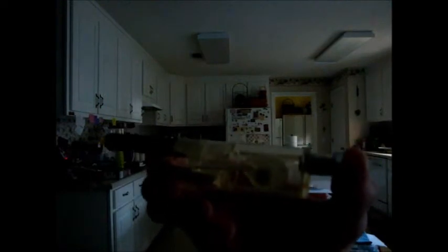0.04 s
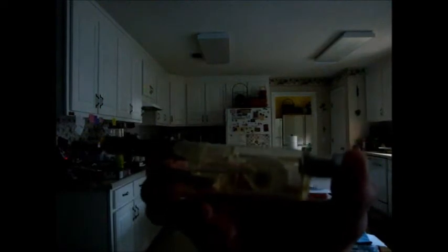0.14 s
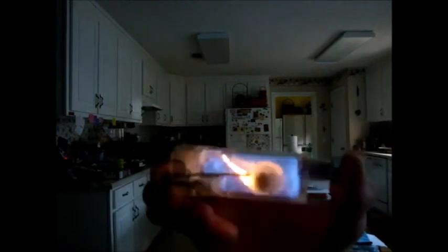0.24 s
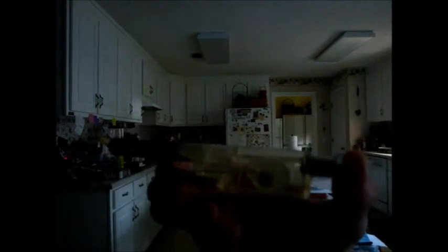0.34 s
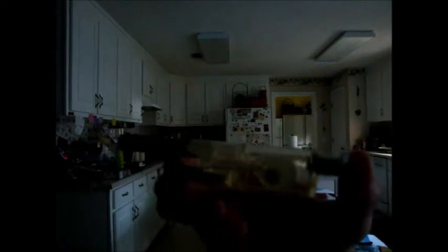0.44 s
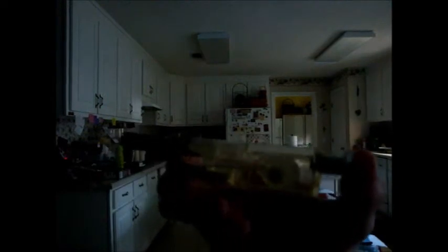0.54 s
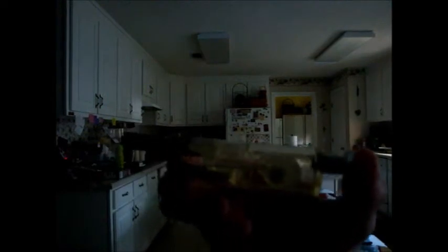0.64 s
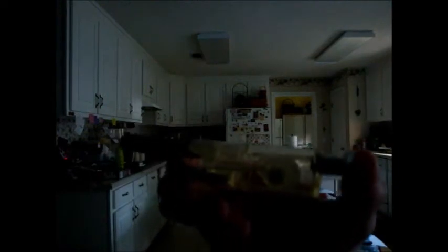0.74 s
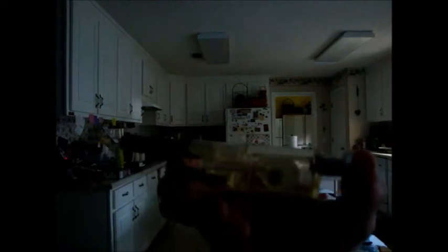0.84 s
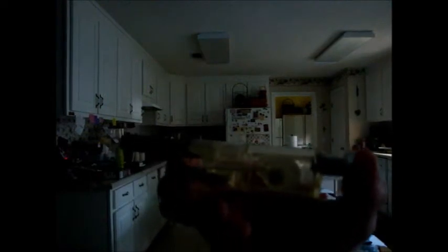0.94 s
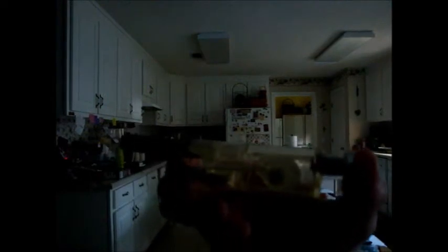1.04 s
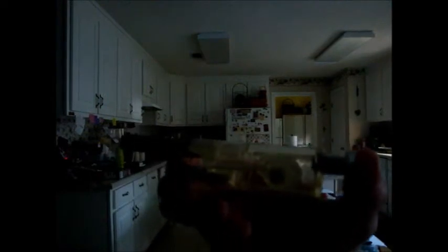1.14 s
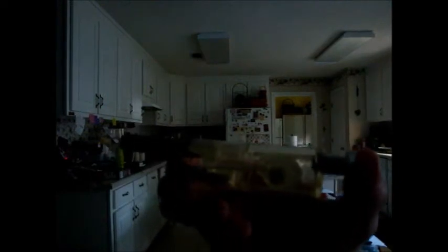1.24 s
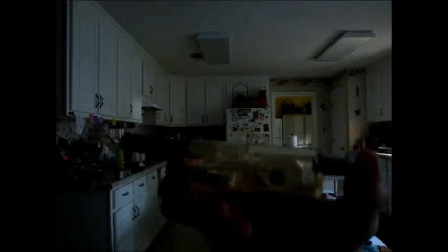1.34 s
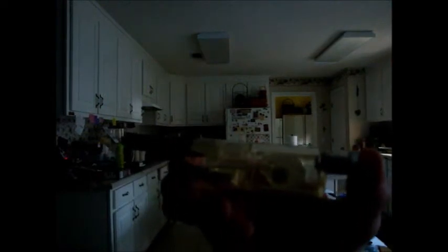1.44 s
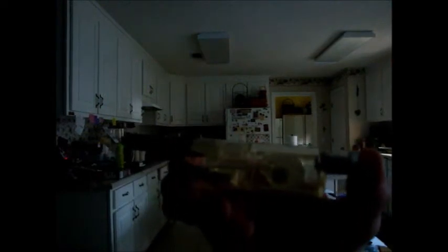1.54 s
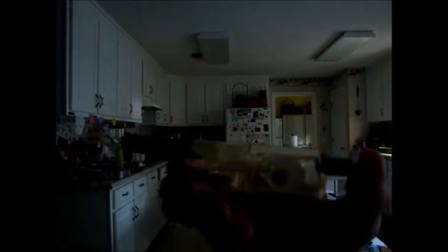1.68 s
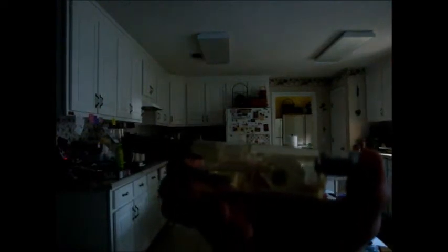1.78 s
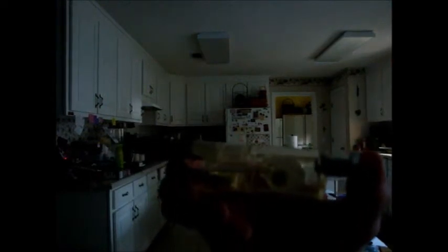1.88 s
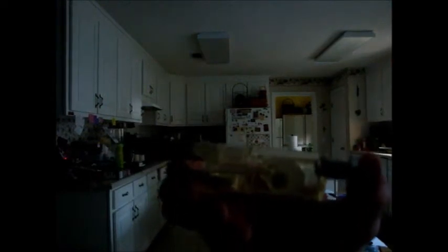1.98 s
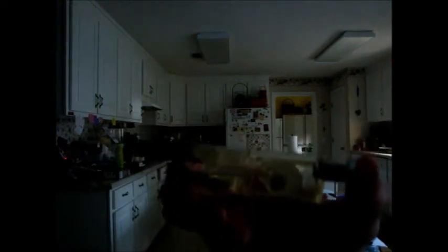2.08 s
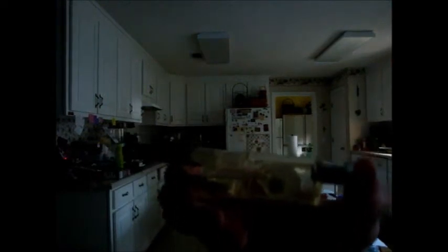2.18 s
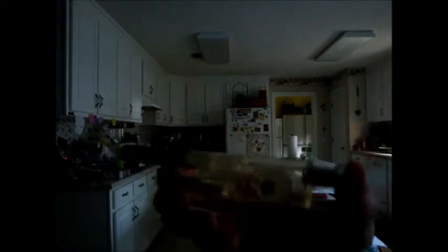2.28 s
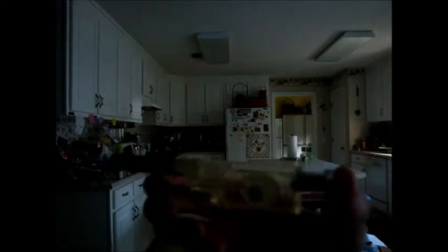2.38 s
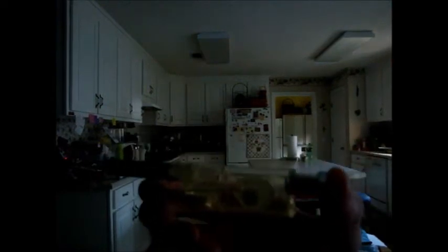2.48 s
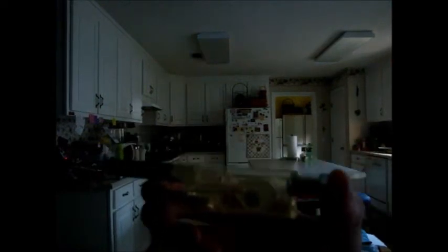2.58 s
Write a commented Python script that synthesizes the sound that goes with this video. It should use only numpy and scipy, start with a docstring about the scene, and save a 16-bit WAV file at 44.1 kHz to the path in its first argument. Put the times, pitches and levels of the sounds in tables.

```python
"""A small hand-held cannon fires in a quiet kitchen: the charge pops, rings the barrel and the room roars back.
A plastic trigger snaps just before it, as pushes, a spring ping and ringing noise, and clicks again later.
The shot strikes a hollow cupboard, then drops: cracks of noise, room tails and close beating modes.
Something ticks at mains rate, a hand knocks and rubs the tube, and a fridge hums in filtered noise.
One microphone hears it all; a limiter holds the bang down and a slower gain control creeps back up."""
import sys
import numpy as np
from scipy import signal
from scipy.fft import rfft, irfft, next_fast_len
from scipy.io import wavfile
from scipy.ndimage import uniform_filter1d, map_coordinates

SR = 44100
rng = np.random.default_rng(int(sys.argv[2]) if len(sys.argv) > 2 else 0)


def int16_out(signal):
    """Quantize to a 16-bit WAV file."""
    q = np.round(np.clip(np.atleast_2d(signal).T, -1, 1) * 32767)
    wavfile.write(sys.argv[1], SR, q.astype(np.int16))


def invert_db(x):
    """Field ratio 10**(x/20) for x, a level in decibels (scalar or array-like)."""
    u = np.asarray(x, float) / 20
    return 10 ** u


N = 114660


def unit(x):
    """Scale a sound to rms 1."""
    return x / np.sqrt(np.mean(x ** 2) + 1e-20)


def along(points, hz):
    """Read a curve of (Hz, value) points on a log frequency axis."""
    f, value = np.transpose(points)
    return np.interp(np.log(hz + 1), np.log(f + 1), value)


def filtered(x, response):
    """Multiply the spectrum of x by a complex response of frequency."""
    size = next_fast_len(N + SR // 2)
    hz = np.fft.rfftfreq(size, 1 / SR)
    return irfft(rfft(x, size) * response(hz), size)[..., :N]


def noise(colour):
    """Noise of rms 1 coloured by (Hz, dB) points."""
    return unit(filtered(rng.standard_normal(N), lambda hz: invert_db(along(colour, hz))))


def resonance(f, centre_hz, width_hz, db):
    """Complex response of one damped resonance, peaking at its centre."""
    damping = 1j * f * width_hz
    return invert_db(db) * damping / (centre_hz ** 2 - f * f + damping)


def resonant(modes):
    """Noise of rms 1 through parallel resonances whose signs alternate."""
    def response(f):
        return sum((-1) ** k * resonance(f, *mode) for k, mode in enumerate(modes))
    return unit(filtered(rng.standard_normal(N), response))


def since(s):
    """Seconds after s, zero before."""
    return np.clip(np.arange(N) / SR - s, 0, None)


def struck(s, db, t60, rise_s=0.00051):
    """An envelope that rises at s and dies away by 60 dB in t60 seconds."""
    t = since(s)
    return invert_db(db - 60 * t / t60) * (1 - np.exp(-t / rise_s))


def push(s, db, width_s):
    """A pressure step with its undershoot, starting downwards."""
    u = since(s) / width_s
    return -invert_db(db) * (u > 0) * (1 - u) * np.exp(-u)


# How long the kitchen rings. Each row: frequency in Hz, t60 in seconds.
KITCHEN_T60 = [(100, 0.15), (400, 0.32), (1200, 0.6), (3000, 0.5), (6000, 0.52), (10000, 0.35)]


def room(s, db, colour, rise_s, hold_s=0):
    """The kitchen's answer to a sound at s: it builds up, holds, then each frequency dies at its own speed."""
    hz, t, spectra = signal.stft(colour, SR, nperseg=256)
    decaying_s = np.clip(t - s - hold_s, 0, None)
    fade = invert_db(-60 * decaying_s / along(KITCHEN_T60, hz)[:, None])
    tail = signal.istft(spectra * fade, SR, nperseg=256)[1][:N]
    return invert_db(db) * tail * (1 - np.exp(-since(s) / rise_s))


# The muzzle pop and its first wall returns. Each row: start in seconds, level in dB before filtering.
MUZZLE_POPS = [(0.2444, 10), (0.2461, 5), (0.2615, 7), (0.2643, 2)]
POP_S, MIC_LOW_HZ = 0.00024, 382  # pop width, low edge of the microphone for the pops
BARREL_HZ, BARREL_WIDTH_HZ, BARREL_DB = 2540, 550, 5
# Colour of the room's roar. Each row: frequency in Hz, relative level in dB per Hz.
ROAR_COLOUR = [(88, -84), (150, -45.5), (385, -28.5), (1360, -15), (1620, -9.5), (2280, -7.5), (2490, -4),
               (3080, -8), (9270, -20), (10500, -30), (13600, -68), (22000, -120)]
ROAR_S, ROAR_DB, ROAR_RISE_S = 0.248, -3, 0.008
# The main body of sound coming back from the far end
SURGE_S, SURGE_DB, SURGE_RISE_S, SURGE_HOLD_S = 0.2665, 7, 0.004, 0.017


def bang():
    """The pop rings the barrel and returns from near walls, then the room roars and surges."""
    def muzzle(f):
        low_cut = 1j * f / (MIC_LOW_HZ + 1j * f)
        return low_cut + resonance(f, BARREL_HZ, BARREL_WIDTH_HZ, BARREL_DB)

    pops = filtered(sum(push(s, db, POP_S) for s, db in MUZZLE_POPS), muzzle)
    roar = room(ROAR_S, ROAR_DB, noise(ROAR_COLOUR), ROAR_RISE_S)
    surge = room(SURGE_S, SURGE_DB, noise(ROAR_COLOUR), SURGE_RISE_S, SURGE_HOLD_S)
    return pops + roar + surge


# Trigger clicks, each with its lead-in tick or bounce. Each row: start in seconds, ring level in dB,
# t60 in seconds, blunt push in dB, spring ping in dB over the ring.
TRIGGER_CLICKS = [(0.227, -26, .05, -40, -10), (0.2287, -12, .13, 0, 1), (1.6643, -32, .015, -25, -4),
                  (1.667, -35, .02, -34, -12), (2.2915, -39, .03, -50, -12), (2.2938, -20, .015, -18, -5)]
# Resonances of the trigger plastic. Each row: centre in Hz, width in Hz, relative level in dB.
TRIGGER_PLASTIC = [(1330, 1700, -17), (2130, 440, -6), (3770, 500, -2.5), (5600, 1300, -7),
                   (6370, 360, -0.5), (7050, 790, -9.5), (9560, 660, -8.5)]
CLICK_ROOM_DB = -27.5  # over the ring
PUSH_S, PUSH_LATE_S = 0.000066, 0.0005
PING_HZ, PING_RISE_S = 3630, 0.0017


def trigger():
    """Each click pushes once, pings a spring, shakes the plastic resonances and wakes the room a little."""
    out = np.zeros(N)
    for s, ring_db, t60, push_db, ping_db in TRIGGER_CLICKS:
        out += push(s + PUSH_LATE_S, push_db, PUSH_S)
        out += struck(s, ring_db, t60) * resonant(TRIGGER_PLASTIC)
        spring = np.sin(2 * np.pi * PING_HZ * since(s))
        out += struck(s, ring_db + ping_db, t60, PING_RISE_S) * spring
        out += room(s, ring_db + CLICK_ROOM_DB, resonant(TRIGGER_PLASTIC), rise_s=0.014)
    return out


# Close modes of the hollow cupboard. Each row: frequency in Hz, relative level in dB.
HOLLOW_MODES = [(1300, -6), (1332, -8), (1370, -4.5)]


def hollow():
    """Close modes that beat against each other, each from a chance phase."""
    t = np.arange(N) / SR
    return sum(invert_db(db) * np.sin(2 * np.pi * (hz * t + rng.random())) for hz, db in HOLLOW_MODES)


# The shot striking, then dropping. Each row: start in seconds, crack level in dB, room level in dB,
# rise of room and ring in seconds, hollow ring level in dB.
SHOT_LANDINGS = [(0.444, -16, -5.5, 0.0078, -12), (0.9475, -17, -20, 0.0075, -51.5)]
# Colour of crack and room tail. Each row: frequency in Hz, relative level in dB per Hz.
LANDING_COLOUR = [(180, -77), (300, -26), (490, -21), (850, -15.5), (1330, -8), (1450, -8), (9050, -8),
                  (10000, -13.5), (10500, -70), (13600, -62), (22000, -120)]
CRACK_T60_S, CRACK_RISE_S, HOLLOW_T60_S = 0.036, 0.0005, 0.58
THUMP_S, THUMP_DB, THUMP_WIDTH_S = 0.447, -45, 0.002


def landings():
    """Far cracks, mostly heard through the room, with a hollow ring and one thump as a smooth pressure bump."""
    from_thump = (np.arange(N) / SR - THUMP_S) / THUMP_WIDTH_S
    out = invert_db(THUMP_DB) * np.exp(-0.5 * from_thump ** 2)
    for s, crack_db, room_db, rise_s, ring_db in SHOT_LANDINGS:
        out += struck(s, crack_db, CRACK_T60_S, CRACK_RISE_S) * noise(LANDING_COLOUR)
        out += room(s, room_db, noise(LANDING_COLOUR), rise_s)
        out += struck(s, ring_db, HOLLOW_T60_S, rise_s) * hollow()
    return out


# Spells of ticking. Each row: start in seconds, end in seconds, level in dB.
TICKING_SPELLS = [(1.575, 1.64, -35), (1.878, 1.945, -33.5), (1.945, 2.158, -30), (2.158, 2.175, -41)]
# Ringing modes of one tick. Each row: frequency in Hz, damping width in Hz, relative level in dB.
TICK_MODES = [(4200, 770, -6.5), (5220, 600, -1), (5730, 880, 2.5), (6430, 1100, -6), (7200, 1700, -19),
              (9260, 890, -9)]
TICK_HZ, TICK_AT_S, TICK_RISE_S = 60, 2.0002, 0.0008  # mains rate, time of one tick, onset
TICK_SCATTER_DB, TICK_DETUNE = 1.8, 0.02  # spread of each mode's level and relative pitch


def ticking():
    """Short bright bursts of damped modes, one per mains cycle, while a spell lasts."""
    times = TICK_AT_S + np.arange(-30, 12) / TICK_HZ
    scatter_db = TICK_SCATTER_DB * rng.standard_normal((len(times), len(TICK_MODES)))
    detune = 1 + TICK_DETUNE * rng.standard_normal(scatter_db.shape)
    t = np.arange(SR // 50) / SR
    onset = 1 - np.exp(-t / TICK_RISE_S)
    out = np.zeros(N)
    for s, extra_db, tune in zip(times, scatter_db, detune):
        ring = np.zeros(len(t))
        for (hz, width_hz, db), extra, ratio in zip(TICK_MODES, extra_db, tune):
            decay = np.exp(-np.pi * width_hz * t / 2)
            ring += invert_db(db + extra) * decay * np.sin(2 * np.pi * hz * ratio * t)
        level = sum(invert_db(db) for start, end, db in TICKING_SPELLS if start <= s < end)  # zero between spells
        out[round(s * SR):][:len(t)] += level * ring * onset
    return out


# Fingers knocking the tube. Each row: start in seconds, level in dB.
FINGER_KNOCKS = [(1.298, -36), (2.3305, -31), (2.346, -31), (2.54, -37)]
# Dull modes of a knock. Each row: frequency in Hz, relative level in dB.
KNOCK_MODES = [(380, 0), (1050, -1.72)]
KNOCK_T60_S = 0.023
# Resonances of the tube under a sliding hand. Each row: centre in Hz, width in Hz, relative level in dB.
TUBE_MODES = [(1000, 140, 5), (1930, 130, -2.5), (2680, 81, 3.5), (3680, 78, -8)]
RUB_S, RUB_SPREAD_S, RUB_DB = 2.42, 0.047, -46  # middle and spread of the slide's bell-shaped swell


def hand():
    """Dull finger knocks as damped sines and one slide that sounds the tube with resonant noise."""
    swell = np.exp(-0.5 * ((np.arange(N) / SR - RUB_S) / RUB_SPREAD_S) ** 2)
    out = invert_db(RUB_DB) * swell * resonant(TUBE_MODES)
    for s, db in FINGER_KNOCKS:
        for hz, mode_db in KNOCK_MODES:
            out -= struck(s, db + mode_db, KNOCK_T60_S) * np.sin(2 * np.pi * hz * since(s))
    return out


# Colour of the fridge and air noise. Each row: frequency in Hz, relative level in dB per Hz.
AIR_COLOUR = [(15, -45), (25, -47), (60, -27), (105, -26.5), (190, -13.5), (270, -10.5), (424, -8),
              (860, -12), (1260, -14.5), (1460, -17.5), (3500, -25.5), (8800, -29.5), (10500, -31)]
# Fuzzy hum lines. Each row: centre in Hz, width in Hz, relative level in dB.
HUM_LINES = [(116.4, 5.7, -12), (416, 8.7, -1), (725, 16, -5.5), (892, 16, -0.5)]
AIR_DB, HUM_DB = -48.5, -53
MAINS_HZ, MAINS_DB = 241, -53


def kitchen():
    """Fridge and air noise, fuzzy hum lines and one steadier mains tone whose phase wavers."""
    t = np.arange(N) / SR
    waver = map_coordinates(rng.standard_normal(40), [t * 12])  # 12 chance points a second, smoothly joined
    mains = invert_db(MAINS_DB) * np.sin(2 * np.pi * MAINS_HZ * t + 0.27 * waver)
    return invert_db(AIR_DB) * noise(AIR_COLOUR) + invert_db(HUM_DB) * resonant(HUM_LINES) + mains


def scene():
    """Everything reaches one microphone, the same on both channels."""
    mono = bang() + trigger() + landings() + ticking() + hand() + kitchen()
    return np.tile(mono, (2, 1))


def level_db(x, window_s):
    """Running rms level in dB."""
    power = uniform_filter1d(x ** 2, max(int(window_s * SR), 1))
    return 10 * np.log10(np.abs(power) + 1e-12)


def follow_db(x, start_db, share, window_s, release_db_per_s):
    """Gain in dB that drops just after the level passes start_db and climbs back at a steady rate."""
    late = max(int(window_s * SR), 2)
    climb_db = release_db_per_s * np.arange(N) / SR
    cut_db = np.minimum(0, share * (start_db - level_db(x, window_s)))
    # the deepest cut so far, counting how far each has climbed back
    gain_db = np.minimum.accumulate(cut_db - climb_db) + climb_db
    return uniform_filter1d(np.pad(gain_db, (late, 0))[:N], late)


def top_cut(x):
    """Nothing passes above the cut-off."""
    return signal.sosfilt(signal.butter(12, 11280, fs=SR, output="sos"), x)


GAIN_FROM_DB, GAIN_SHARE, GAIN_S, RECOVER_DB_PER_S = -29, 0.36, 0.025, 9.5
CEILING_DB, LIMIT_SHARE, LIMIT_S, LIMIT_RELEASE_DB_PER_S = -13, 0.91, 0.0016, 882
TOP_HZ = 10150


def record(dry):
    """A slow gain control that creeps back up, a fast limiter, hard overload and a steep treble limit."""
    x = dry[0]
    x = x * invert_db(follow_db(x, GAIN_FROM_DB, GAIN_SHARE, GAIN_S, RECOVER_DB_PER_S))
    x = x * invert_db(follow_db(x, CEILING_DB, LIMIT_SHARE, LIMIT_S, LIMIT_RELEASE_DB_PER_S))
    overloaded = np.clip(x, -0.85, 0.85)
    mono = filtered(overloaded, lambda hz: 1 / (1 + (hz / TOP_HZ) ** 80))
    return top_cut(np.tile(mono, (2, 1)))


dry = scene()
out = record(dry)
int16_out(out)
```